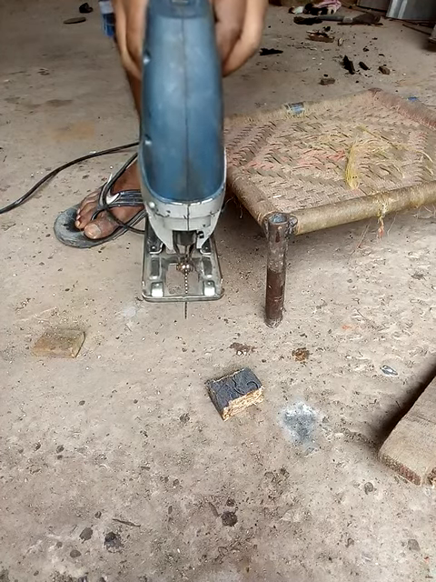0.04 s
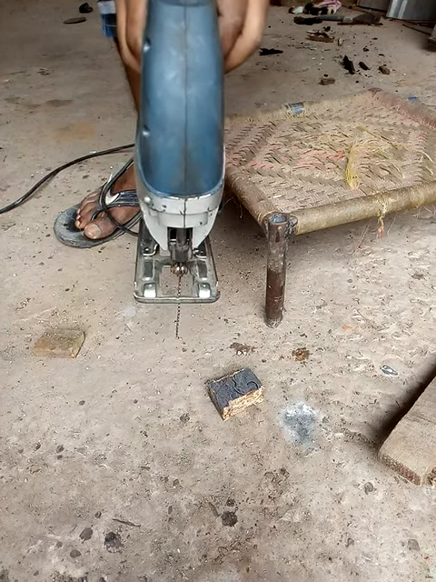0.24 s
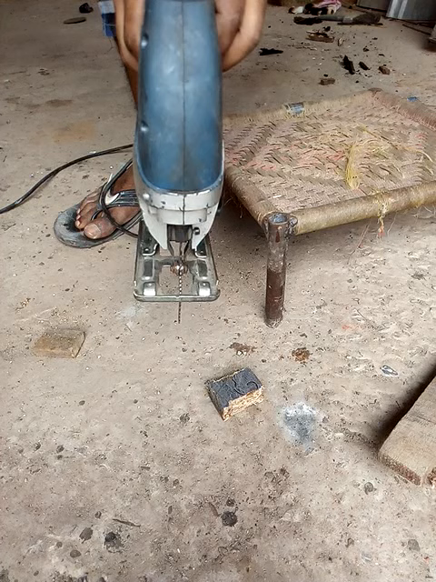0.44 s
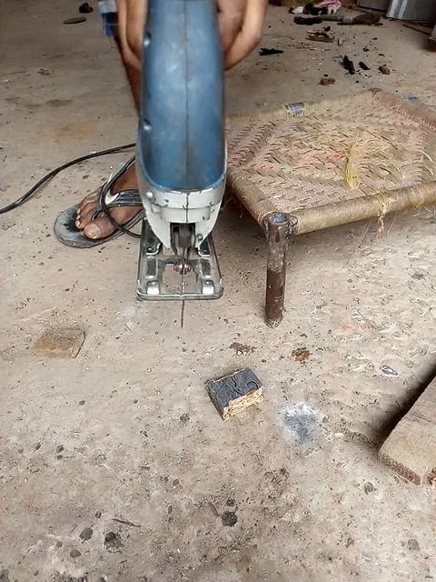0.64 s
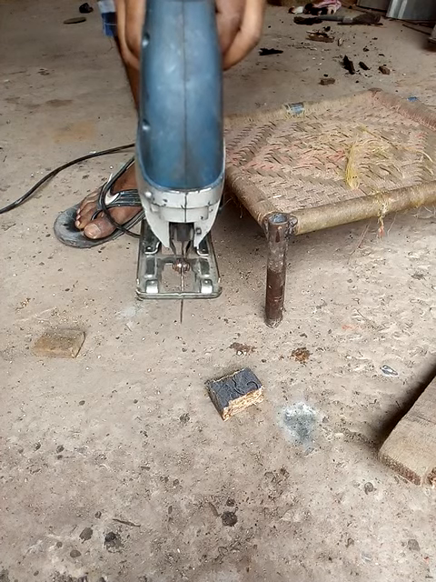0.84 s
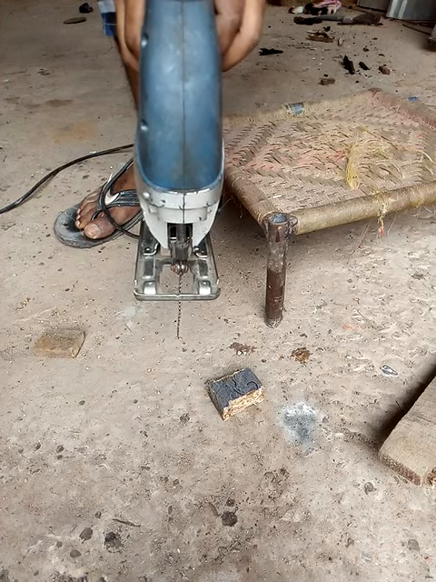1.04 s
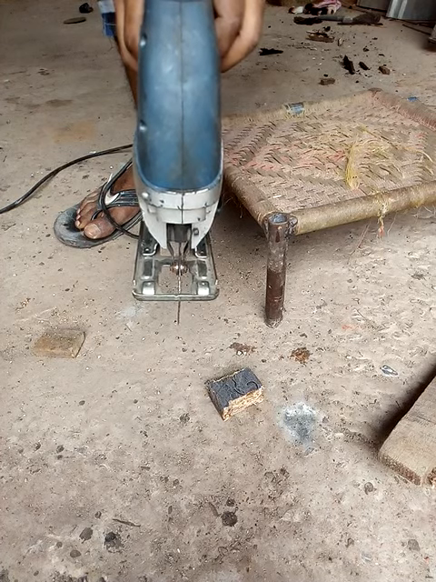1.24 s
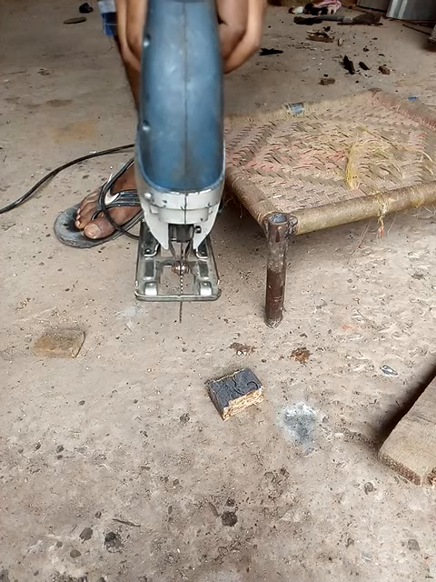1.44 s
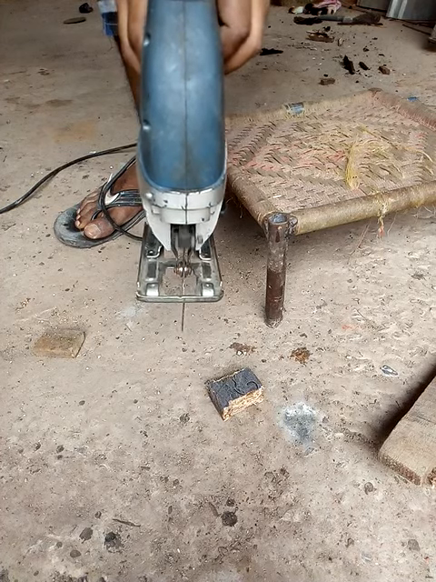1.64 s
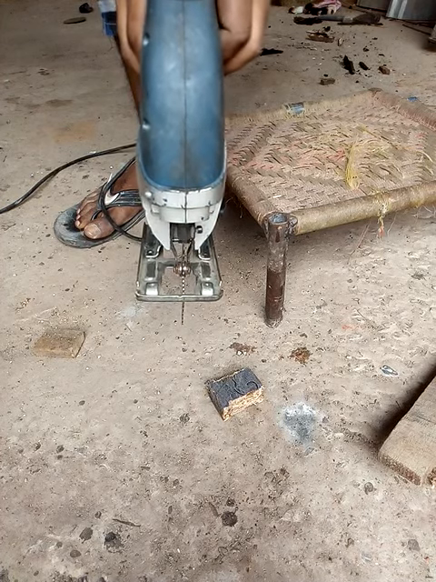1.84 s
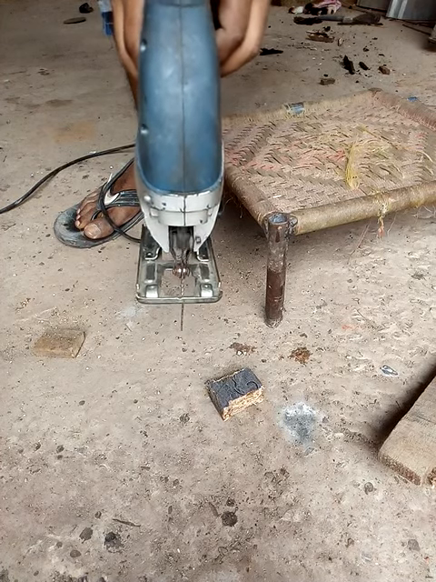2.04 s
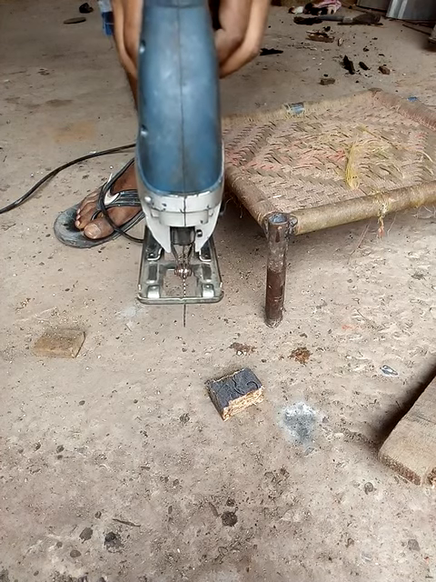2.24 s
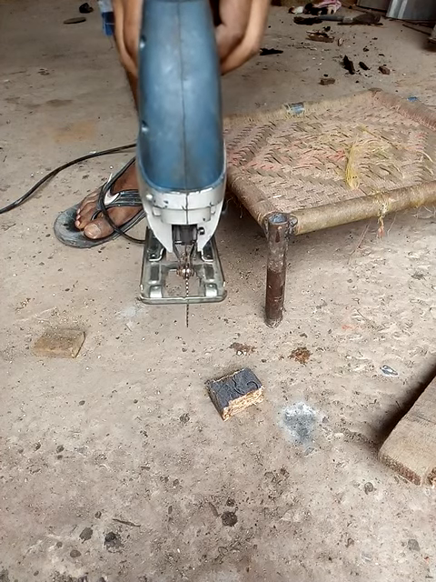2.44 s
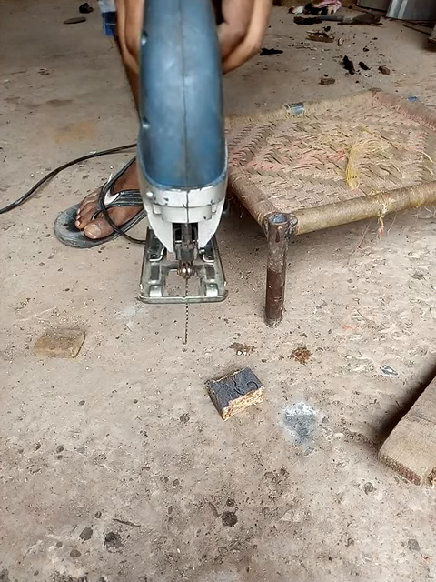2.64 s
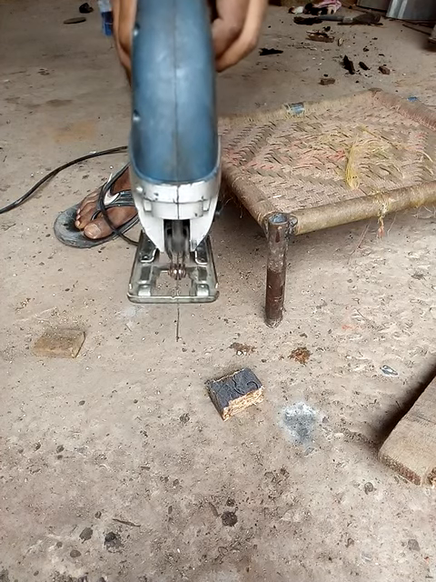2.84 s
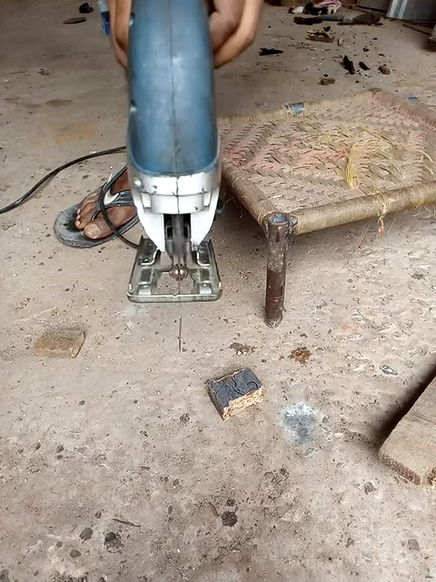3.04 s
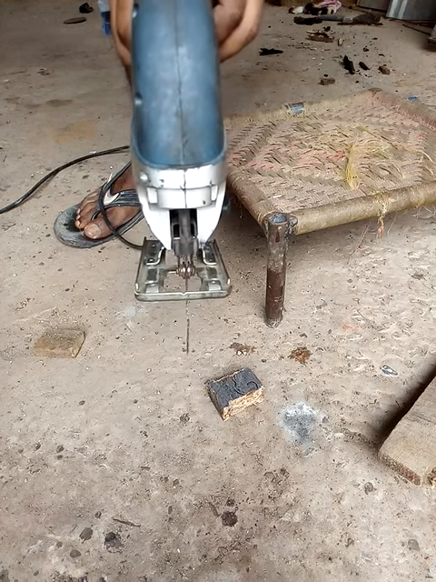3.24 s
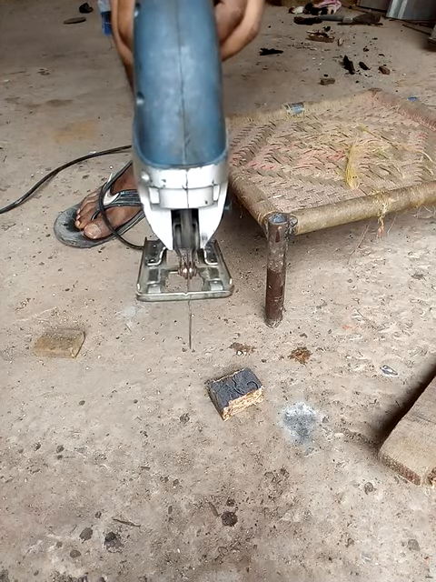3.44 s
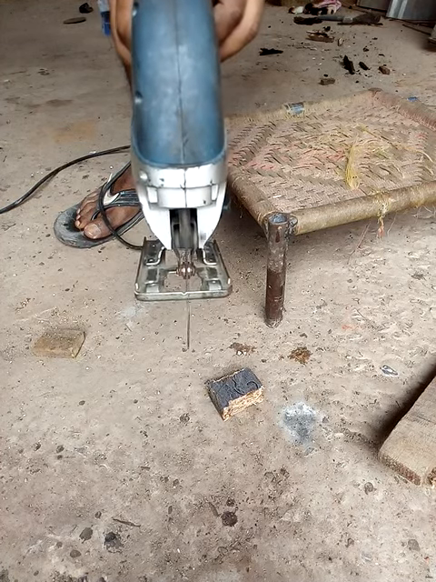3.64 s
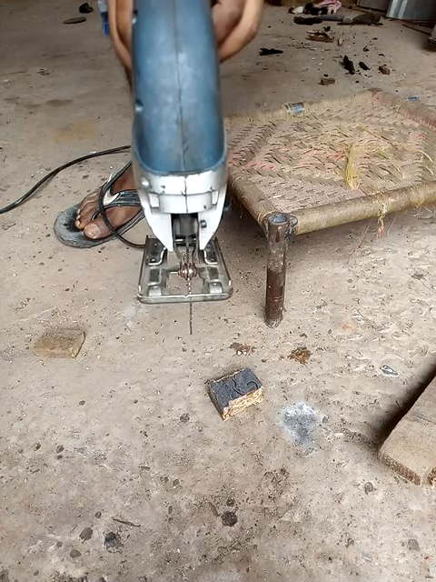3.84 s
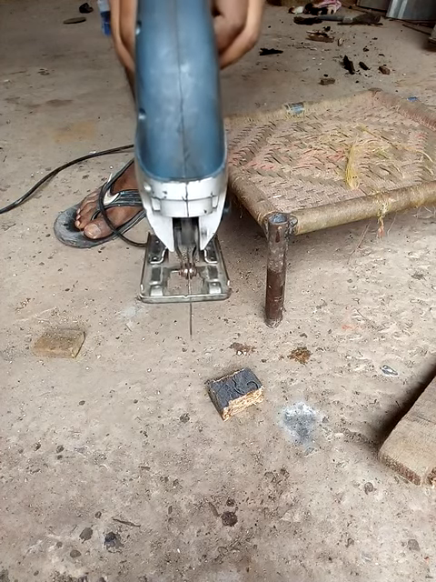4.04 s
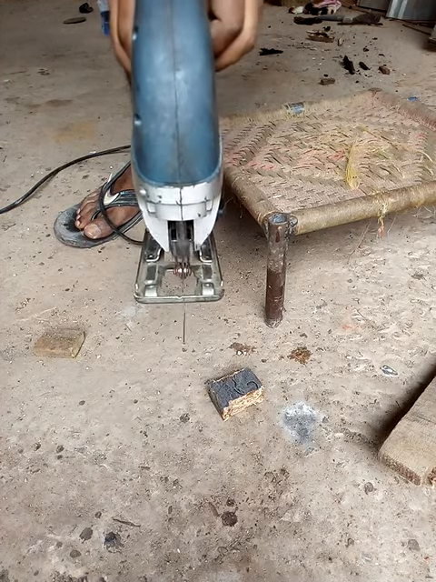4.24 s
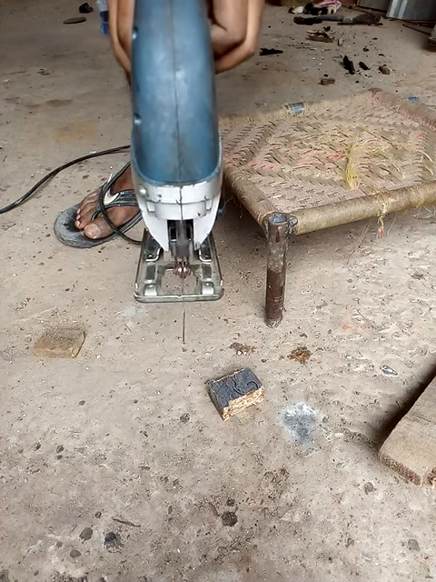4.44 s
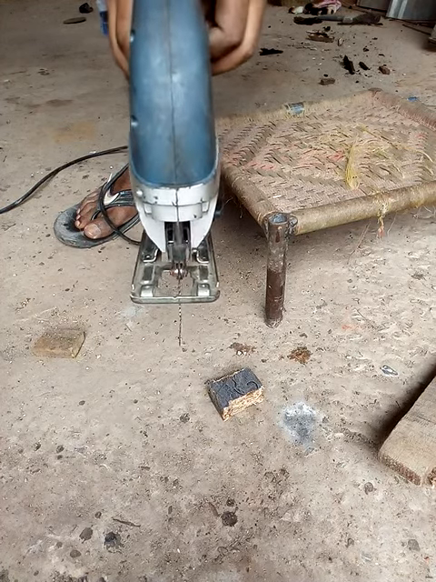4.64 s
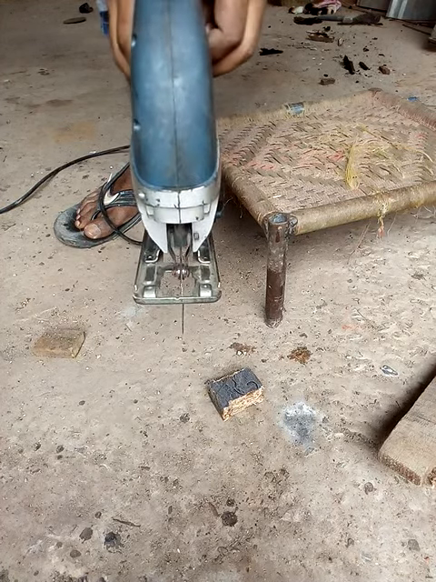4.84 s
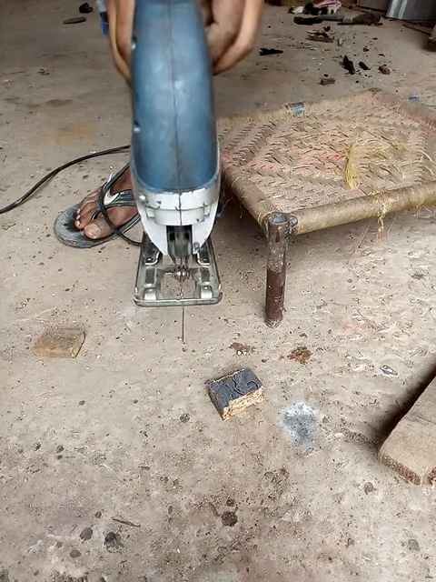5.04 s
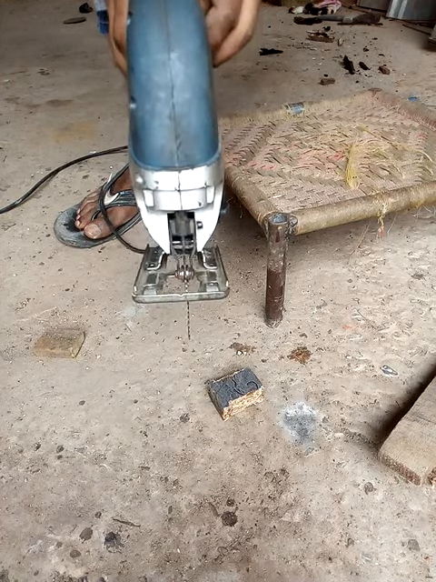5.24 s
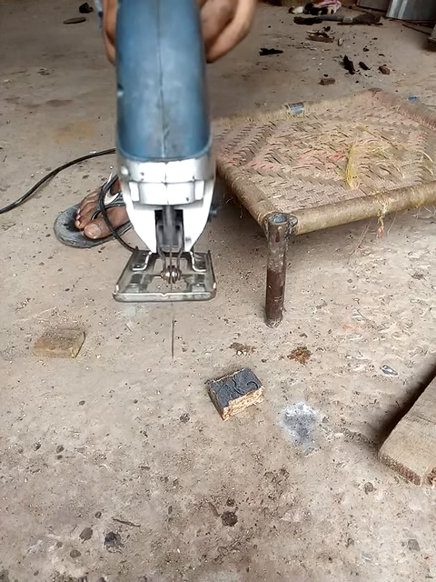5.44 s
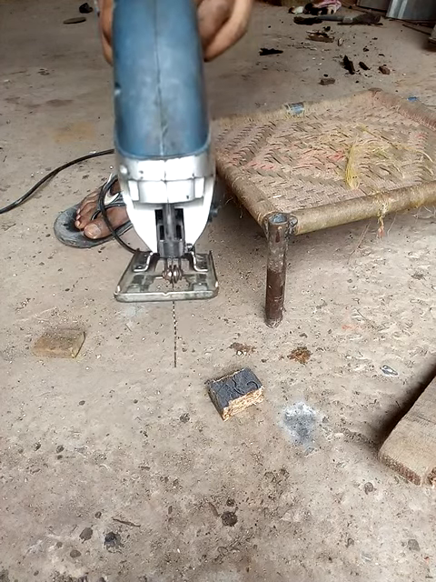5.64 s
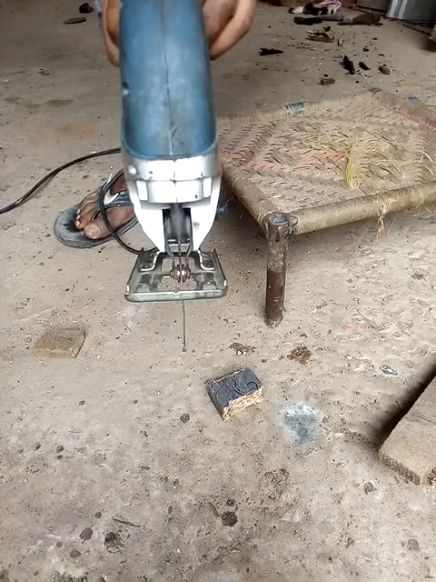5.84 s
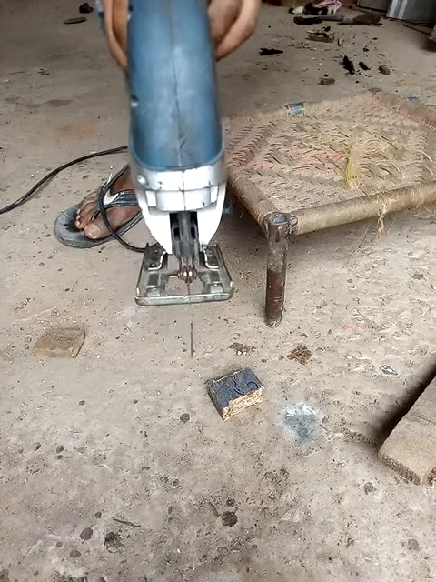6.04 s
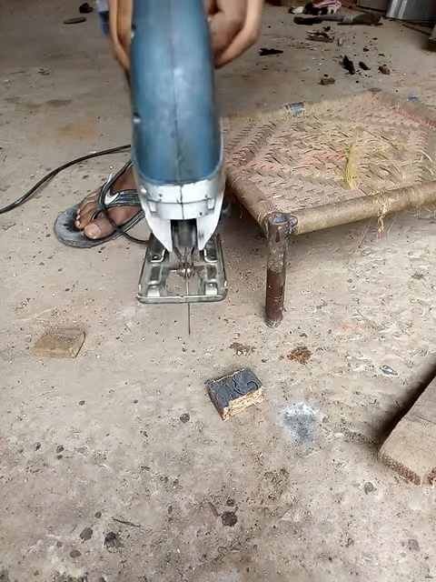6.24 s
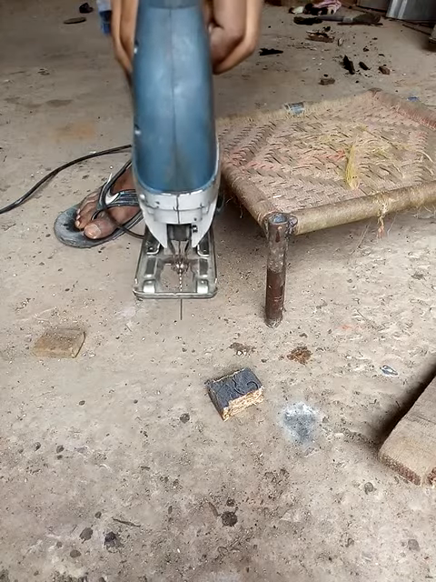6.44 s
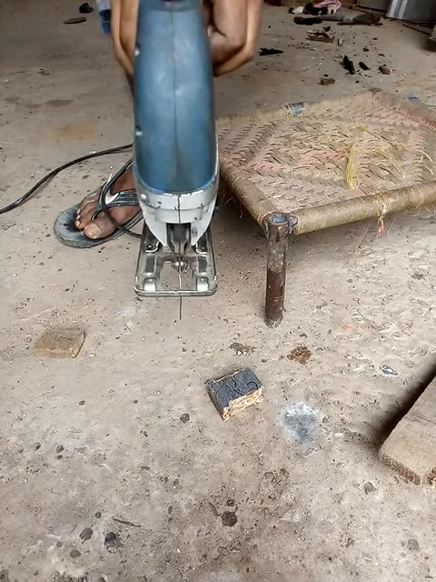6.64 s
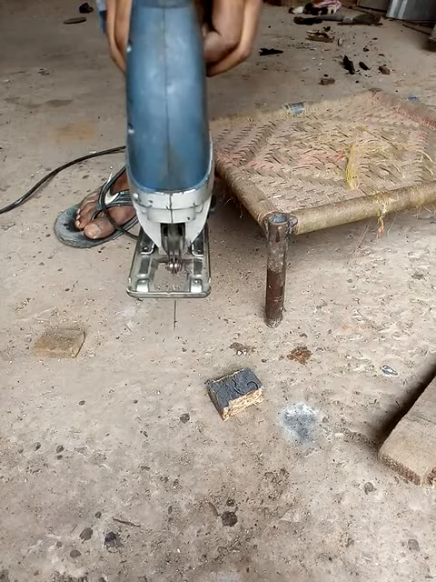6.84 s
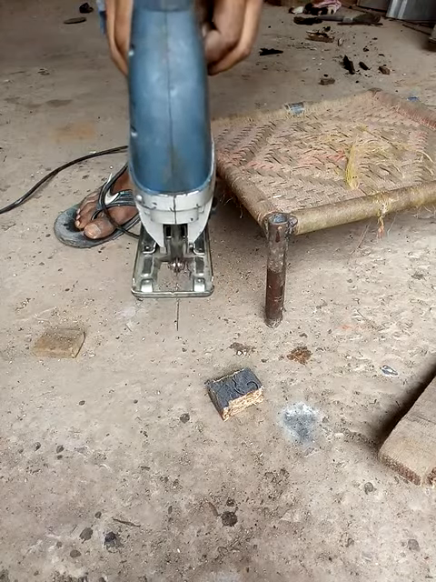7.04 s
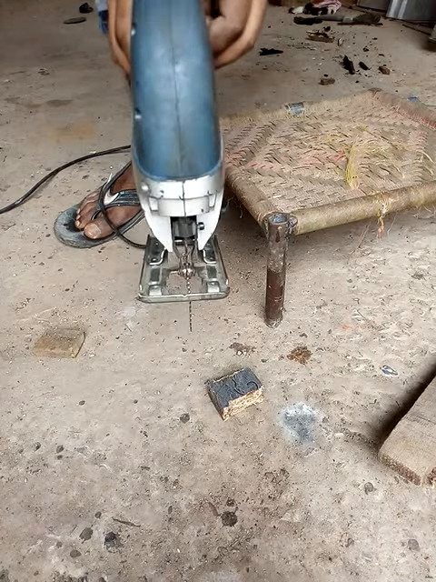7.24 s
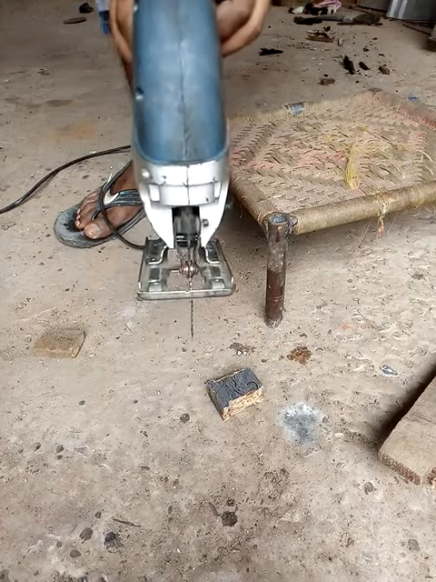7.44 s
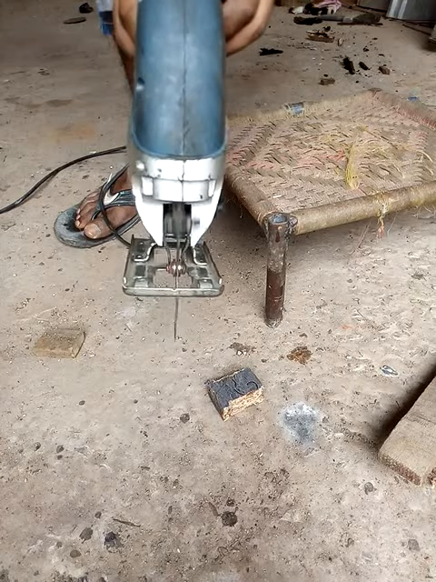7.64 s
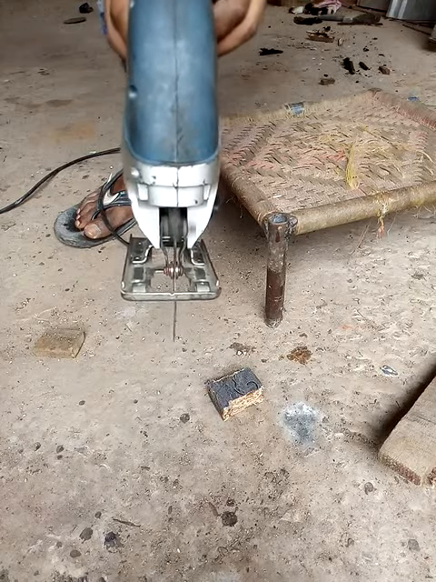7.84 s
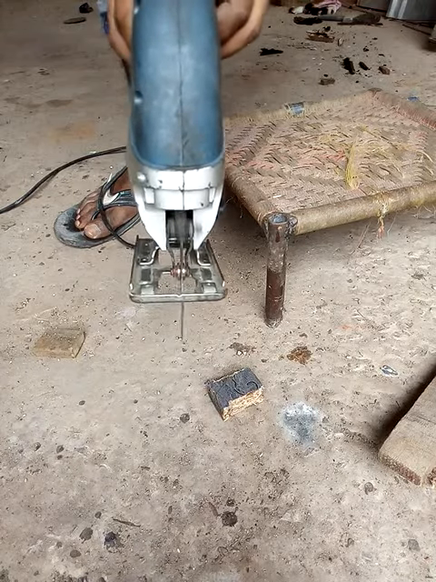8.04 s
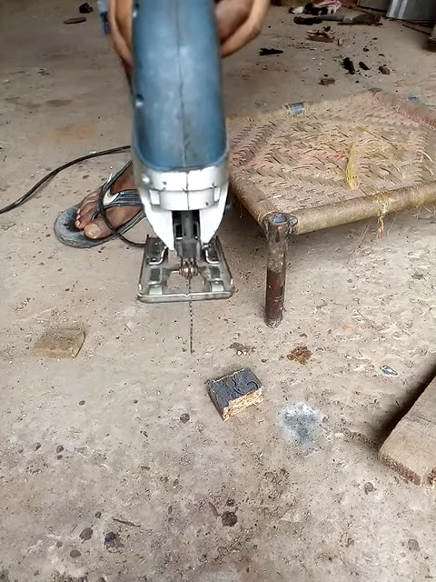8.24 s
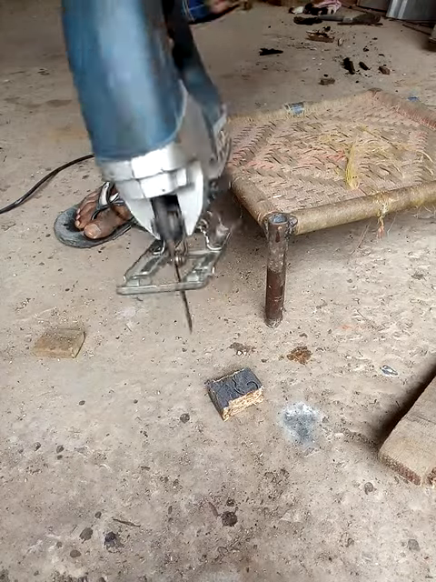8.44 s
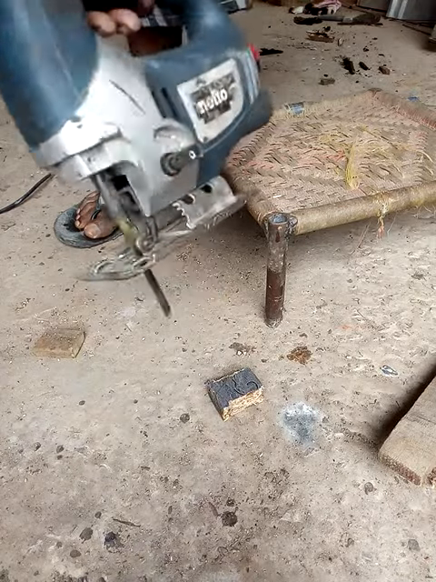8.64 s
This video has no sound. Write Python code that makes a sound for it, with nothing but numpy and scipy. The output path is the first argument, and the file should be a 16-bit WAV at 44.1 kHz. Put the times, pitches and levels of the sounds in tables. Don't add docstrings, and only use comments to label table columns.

```python
import sys
import numpy as np
from scipy import signal
from scipy.io import wavfile
from scipy.ndimage import uniform_filter1d

SR = 44100
rng = np.random.default_rng(int(sys.argv[2]) if len(sys.argv) > 2 else 0)


def volts(x):
    e = np.asarray(x, float) / 20
    return 10 ** e


def put_to_file(sound):
    columns = np.atleast_2d(sound).T
    safe = np.clip(columns, -1, 1)
    whole_steps = np.round(safe * 32767)
    wavfile.write(sys.argv[1], SR, whole_steps.astype(np.int16))


N = 383669

# f/Hz, level/dB
YARD_SPECTRUM = [(25, -34), (70, -9), (150, -10), (250, -8), (500, -16), (800, -15), (1100, -24),
                 (2700, -23), (6000, -29), (8800, -42), (15500, -41)]
# f/Hz, width/Hz, level/dB
YARD_MODES = [(355, 20, 5), (810, 50, -8), (1380, 60, -15), (2750, 100, -14)]
# pulled t/s, released t/s, goal whine f/Hz, spin-up time/s, spin-up exponent/1
SQUEEZES = [
    (.28073, 1.57684, 8124.98, .583759, 1.11325),
    (2.73215, 3.88901, 13572.4, .340858, .863915),
    (5.33644, 5.95165, 16420.8, .249423, .853913),
    (7.64475, 8.11579, 16870.5, .184556, .905251),
]
# t/s, level over the stream/dB, half length/s
GUSTS = [(.8, -1, .1), (1.5, 3, .05), (3.42, 15, .04), (3.536, 17, .025), (3.93, 18, 0.029), (4.08, 0, .03),
         (4.18, 8, .03), (5.696, 15, 0.027), (5.84, 8, 0.076), (6.055, 14, 0.064), (6.2, 1, .03),
         (6.29, 4, .02), (8.11, 4, .04), (8.26, 8, 0.024), (8.357, 8, .06), (8.64, 6, .025)]
# f/Hz, level/dB
BUFFET_SPECTRUM = [(12, -42), (20, -9), (96, 4.5), (174, -0.5), (240, -6), (310, -5), (530, -120)]
# f/Hz, level/dB
WHINE_LEVEL = [(2500, -90), (6500, -66), (8000, -67.5), (10000, -69), (11500, -65.5), (12800, -61.5),
               (15500, -60.5)]
# f/Hz, level/dB
SHAFT_LEVEL = [(300, -75), (420, -58), (500, -52), (540, -53), (600, -60), (700, -75)]
# t/s, f/Hz, level/dB
STALL = [(.1, 2600, -85), (.135, 2580, -70), (.19, 2530, -62), (.26, 2510, -66), (.32, 2500, -85)]
# f/Hz, width/Hz, level/dB
SHELL_MODES = [(307.3, 59, -11), (351.5, 18, -1.5), (381.7, 11, -8.5), (766, 56.5, -6), (832, 29.4, 2.5),
               (1330, 165, -17), (1376.7, 61, -1)]
# f/Hz, level/dB
SHELL_BASE = [(50, -57), (100, -28.5), (240, -25.5), (420, -23), (560, -25), (680, -25), (920, -15),
              (1050, -23), (1200, -16.5), (1500, -17.5), (1750, -22), (1900, -56)]
# f/Hz, width/Hz, level/dB
GEAR_MODES = [(1992, 80, 0), (2417, 81, -1), (2665, 18, 1), (2820, 36, -1.5), (2990, 150, -7),
              (3480, 17, -9), (4105, 100, -7.5), (4640, 35, -14), (4710, 72, -5), (5200, 79, -10.5),
              (6093, 89, -11), (6700, 36, -22), (7710, 85, -19.5)]
# f/Hz, level/dB
GEAR_BASE = [(1000, -48), (1600, -11.5), (1830, -12), (2000, -1), (2900, -3.5), (3450, -9.5), (4050, -5.5),
             (4800, -9.5), (5600, -16), (6300, -11.5), (7300, -21), (7850, -41), (8000, -35), (9000, -60)]
# f/Hz, width/Hz, depth/1
FLOOR_NOTCH = (5040, 160, .95)
# f/Hz, level/dB
HISS_BASE = [(7000, -30), (7800, -8), (8300, -10), (9500, -13), (10200, -16), (11400, -17), (13000, -16),
             (13700, -18), (14200, -13), (15600, -12)]
# f/Hz, width/Hz, level/dB
HISS_MODES = [(8490, 80, -9), (9110, 250, -13), (9700, 100, -14), (10700, 300, -14), (11900, 170, -15),
              (12400, 250, -14), (14800, 500, -11)]
# f/Hz, width/Hz, level/dB
KNOCK_MODES = [(356, 29, -7), (2120, 130, 1.5), (2630, 80, 21), (2610, 220, 23), (4230, 300, 0),
               (4640, 140, -18)]
# level at cruise/dB, slope/(dB/octave), bend/(dB/octave^2)
BOOM_LAW = (-28, 9.7, 1.45)
GEAR_LAW = (-30.5, 7.87, 0.83)
HISS_LAW = (-59.5, 10.8, 1.1)
AIR_LAW = (-58, 10.2, 6.3)
# t/s, level/dB
TOOL_LEVEL = [(.2, -15), (.4, -1), (.6, 0.5), (1.5, 0.16), (2.6, 0.5), (2.77, -1), (2.84, -0.4), (3.1, -0.64),
              (3.7, .8), (4.2, -0.9), (5.1, 0.7), (5.45, 0.14), (6.1, -0.04), (6.7, -0.54), (7.6, 0.85),
              (7.8, 0.4), (8.1, -1.6), (8.7, 2.2)]
# (f/Hz, width/Hz, level/dB)
TRIGGER = (.2195, -50.5, [(2100, 300, -6), (3000, 300, -9), (4150, 200, 0), (4750, 250, -4)])
# t/s, peak level/dB
CLICKS = [(0.374, -29), (0.413, -37), (0.4339, -29), (0.614, -22), (0.6988, -22), (0.78, -27), (1.958, -20),
          (2.028, -20), (2.3023, -21), (2.3984, -22), (2.5042, -33), (2.6249, -25), (2.6589, -32),
          (2.804, -26), (2.972, -20), (4.538, -20), (5.243, -17)]
# t/s, level/dB
THUDS = [
    (.568, -42),
    (2.352, -45.5),
]

CREEP_HZ, CRUISE_HZ = 1310.54, 8000
COAST_S, FRICTION_HZ = 2.13967, 4000.04
WHINES_PER_STROKE, FIRST_STROKE = 380, -.1793


def evened(x):
    return x / np.sqrt(np.mean(x ** 2) + 1e-20)


def curve(rows, column=1):
    rows = np.array(rows)
    return np.interp(np.arange(N) / SR, rows[:, 0], rows[:, column])


def colour(x, base, modes=(), base_db=0, notch=(1, 1, 0)):
    hz = np.fft.rfftfreq(16384, 1 / SR)
    f, db = np.transpose(base)
    power = volts(np.interp(np.log(hz + 1), np.log(f), db, -120, -120) + base_db) ** 2
    for centre_hz, width_hz, peak_db in modes:
        detuning = 1.6 * (hz - centre_hz) / width_hz
        power = power + volts(peak_db) ** 2 / (1 + detuning ** 2) ** 1.5
    notch_hz, notch_width_hz, depth = notch
    power = power * (1 - np.clip(depth, 0, .97) / (1 + (2 * (hz - notch_hz) / notch_width_hz) ** 2))
    log_gain = np.log(power + 1e-10) / 2
    log_gain = np.r_[log_gain, log_gain[-2:0:-1]]
    taps = np.fft.ifft(np.exp(np.conj(signal.hilbert(log_gain)))).real[:6000]
    return signal.oaconvolve(x, taps / np.linalg.norm(taps))[:N]


def flutter(size):
    noise = rng.standard_normal(N)
    return evened(uniform_filter1d(uniform_filter1d(noise, size), size))


def yard():
    level = volts(-58 + 1.0 * flutter(size=2000))
    return level * colour(rng.standard_normal(N), YARD_SPECTRUM, YARD_MODES)


def speed():
    t, hz = np.arange(N) / SR, np.full(N, CREEP_HZ)
    for pulled, released, goal_hz, spin_s, shape in SQUEEZES:
        held = np.clip(t - pulled, 0, released - pulled)
        start_hz = hz[round(pulled * SR)]
        driven = goal_hz - (goal_hz - start_hz) * np.exp(-(held / spin_s) ** shape)
        coast = np.exp(-np.maximum(t - released, 0) / COAST_S)
        hz = np.where(t > pulled, (driven + FRICTION_HZ) * coast - FRICTION_HZ, hz)
    return hz


def loudness(law, hz):
    cruise_db, slope_db, bend_db = law
    octaves = np.log2(hz / CRUISE_HZ)
    return volts(cruise_db + slope_db * octaves + bend_db * octaves ** 2)


def buffet():
    t = np.arange(N) / SR
    keep = np.exp(-1 / (0.18 * SR))
    whine_hz = speed()
    stream_hz = CREEP_HZ + signal.lfilter([1 - keep], [1, -keep], whine_hz - CREEP_HZ)
    puffs_db = sum(db * np.exp(-((t - s) / half) ** 2) for s, db, half in GUSTS)
    lumps = loudness(AIR_LAW, np.maximum(stream_hz, 4000)) * volts(puffs_db + 3.9 * flutter(size=1500))
    air = colour(rng.standard_normal(N), BUFFET_SPECTRUM)
    deep = signal.sosfiltfilt(signal.butter(2, 50, fs=SR, output="sos"), air)
    weak = np.clip((12000 - whine_hz) / 3000, 0, 1)
    return lumps * (air - weak * deep)


def tone(hz):
    return np.sin(2 * np.pi * np.cumsum(hz) / SR)


def whine():
    hz = speed()
    bar_db = np.interp(hz, *np.transpose(WHINE_LEVEL)) + 3.5 * flutter(size=900)
    bars = volts(bar_db) * tone(hz * (1 + .0025 * flutter(size=200)))
    shaft_hz = hz / 14.4
    shaft_db = np.interp(shaft_hz, *np.transpose(SHAFT_LEVEL)) + 2.0 * flutter(size=2000)
    shaft = volts(shaft_db) * tone(shaft_hz)
    stall_db = curve(STALL, column=2) + 3 * flutter(size=250)
    stall = volts(stall_db) * tone(curve(STALL) + 25 * flutter(size=150))
    return np.sqrt(2) * (bars + shaft + stall)


def rattle(per_s, spread_db):
    tick_level = volts(spread_db * np.minimum(rng.exponential(1, N), 4))
    ticks = (rng.random(N) < per_s / SR) * tick_level * rng.choice([-1, 1], N)
    return evened(evened(ticks) + 1.12 * rng.standard_normal(N))


def bump(phase, start, length):
    u = (phase - start) % 1 / length
    rise = np.minimum(u / .06, 1)
    fall = (1 - .45 * u) * np.sqrt(np.clip(1 - u ** 3, 0, 1))
    return np.where(u < 1, rise * fall, 0)


def slide_gate(stroke, slack):
    drag_db = 5.5 * bump(stroke, .76, .24) - 1.5 * bump(stroke, .03, .17) + 1.5 * bump(stroke, .5, .22)
    scrape_db = slack * (drag_db + 1.2 * flutter(size=300))
    turn_db = 2.2 * bump(stroke, .19, .15)
    gate = volts(scrape_db + turn_db)
    return gate / np.sqrt(uniform_filter1d(gate ** 2, size=6000))


def guide_knocks(stroke):
    at = np.nonzero(np.diff(np.floor(stroke - .22)) > 0)[0]
    blows = np.zeros(N)
    blows[at] = volts(3.0 * rng.standard_normal(len(at))) * np.sqrt(SR / 40)
    return volts(-14.5) * colour(blows, [(200, -42), (1800, -34), (7000, -25), (9000, -53)], KNOCK_MODES)


def jigsaw():
    whine_hz = speed()
    stroke = FIRST_STROKE + np.cumsum(whine_hz) / SR / WHINES_PER_STROKE + .012 * flutter(size=1500)
    slack = np.clip((11000 - whine_hz) / 3000, .12, 1)
    gate = slide_gate(stroke, slack)
    drive = rattle(1400 * whine_hz / CRUISE_HZ, 2.06) * gate
    boom = colour(rattle(1500, 3.26) * gate ** 0.34, SHELL_BASE, SHELL_MODES, base_db=-1.0)
    gears = colour(drive, GEAR_BASE, GEAR_MODES, base_db=-2.5, notch=FLOOR_NOTCH)
    hiss = colour(rattle(4000, 1.5) * gate ** 0.85, HISS_BASE, HISS_MODES)
    knocks = volts(2.1 * slack) * guide_knocks(stroke)
    body = loudness(BOOM_LAW, whine_hz) * boom + loudness(HISS_LAW, whine_hz) * hiss
    body += loudness(GEAR_LAW, whine_hz) * (gears + knocks)
    onset = np.clip((np.arange(N) / SR - .2) / 0.053, 0, 1)
    return body * volts(curve(TOOL_LEVEL)) * onset


def clicks():
    snap, blows, thud = np.zeros((3, N))
    s, db, modes = TRIGGER
    snap[round(s * SR):][:400] = volts(db - np.arange(400) * 0.013) * rng.standard_normal(400)
    for s, db in CLICKS:
        blows[round(s * SR)] = volts(db + 10.5)
    lurch = np.hanning(1100) * np.sin(2 * np.pi * SHELL_MODES[4][0] * np.arange(1100) / SR)
    for s, db in THUDS:
        thud[round(s * SR):][:1100] = volts(db) * lurch
    switch = colour(snap, [(1200, -38), (1900, -10), (7000, -20), (12000, -50)], modes)
    slide = colour(blows, [(1200, -40), (1900, -15), (7000, -40), (12000, -60)], KNOCK_MODES[1:])
    return switch + slide + colour(thud, SHELL_BASE, SHELL_MODES)


def nearby(x):
    echo_db, t60_s = -16, .1
    taps = np.zeros(4400)
    at = np.arange(60, 4380, 20) + rng.integers(0, 20, 216)
    taps[at] = rng.choice([-1., 1.], 216) * volts(-60 * at / SR / t60_s)
    taps = signal.sosfilt(signal.butter(2, 1800, "high", fs=SR, output="sos"), taps)
    wet = volts(echo_db) * signal.oaconvolve(x, taps / np.linalg.norm(taps))[:N]
    return (x + wet) / np.sqrt(1 + volts(echo_db) ** 2)


def scene():
    tool = jigsaw() + clicks() + whine()
    return (nearby(tool) + buffet() + yard())[None]


def band_limit(x):
    return signal.sosfilt(signal.butter(12, 16590, fs=SR, output="sos"), x)


def record(dry):
    soft = .95 * np.tanh(dry / .95)
    edge = signal.firwin(1201, 15470, window=("kaiser", 9), fs=SR)
    mix = signal.oaconvolve(soft, edge[None], "same")
    return band_limit(mix)


dry = scene()
out = record(dry)
put_to_file(out)
```